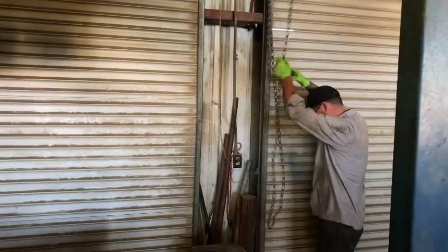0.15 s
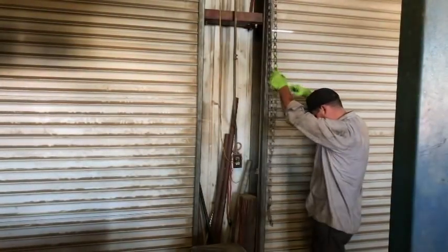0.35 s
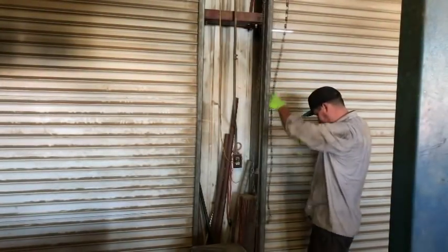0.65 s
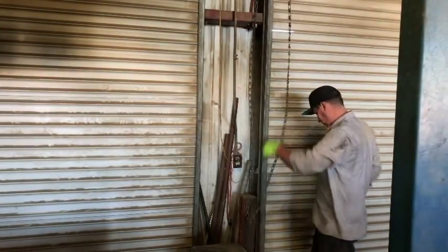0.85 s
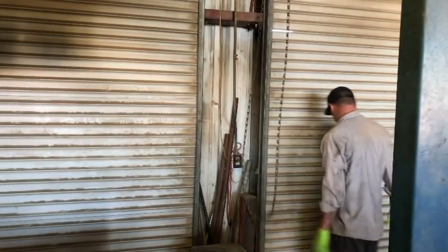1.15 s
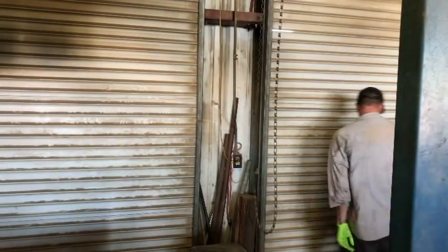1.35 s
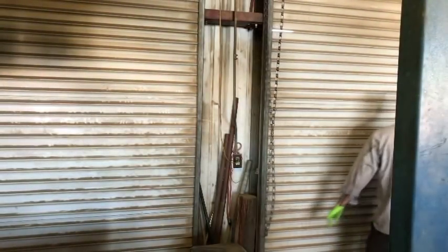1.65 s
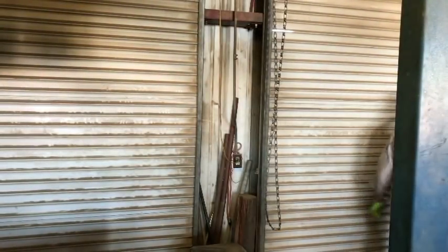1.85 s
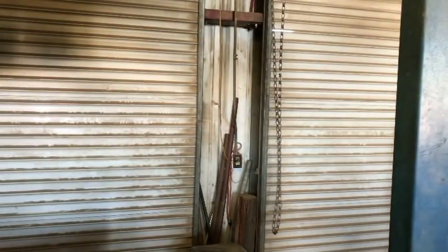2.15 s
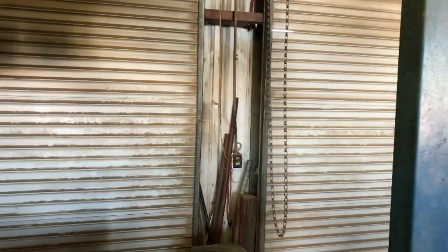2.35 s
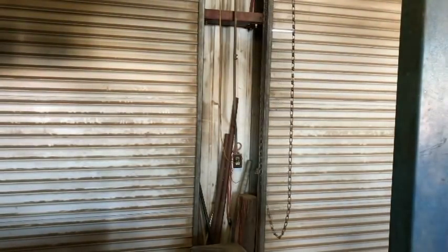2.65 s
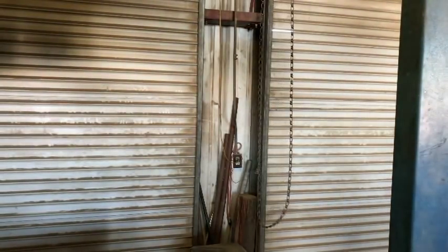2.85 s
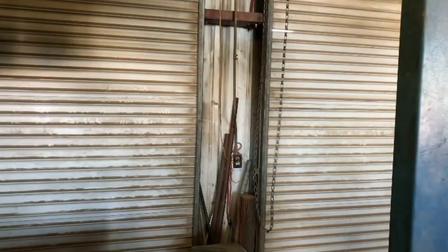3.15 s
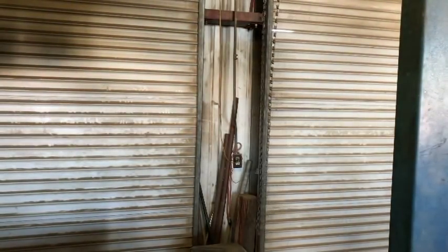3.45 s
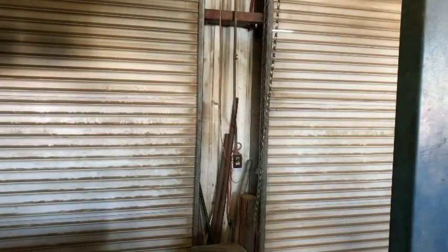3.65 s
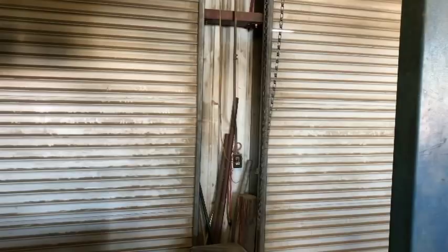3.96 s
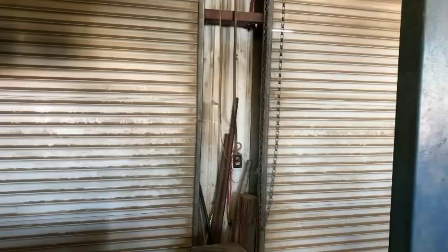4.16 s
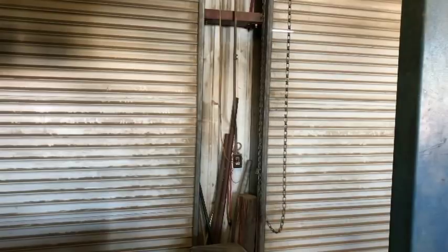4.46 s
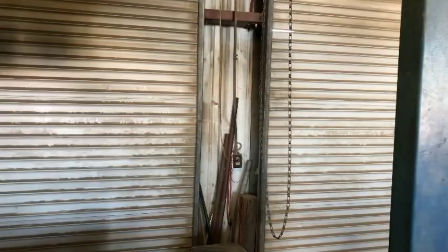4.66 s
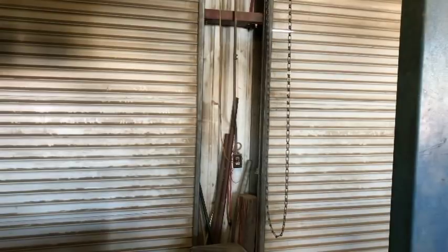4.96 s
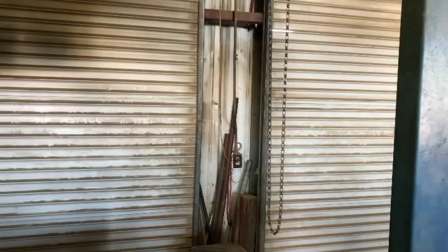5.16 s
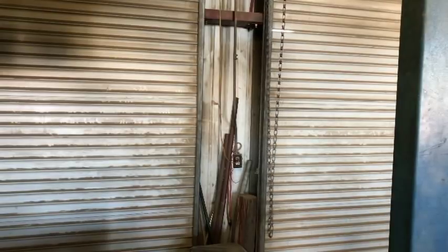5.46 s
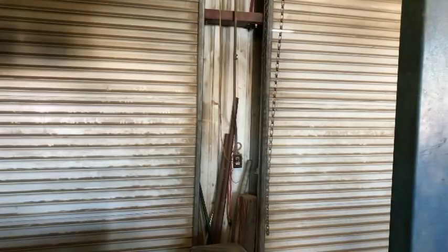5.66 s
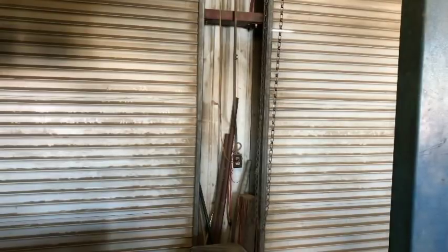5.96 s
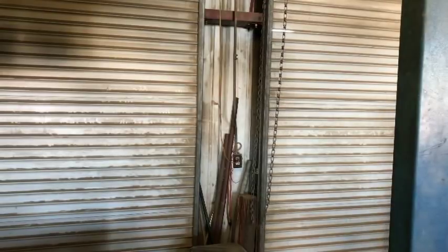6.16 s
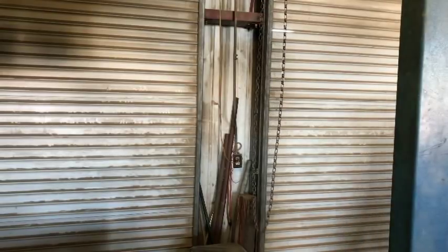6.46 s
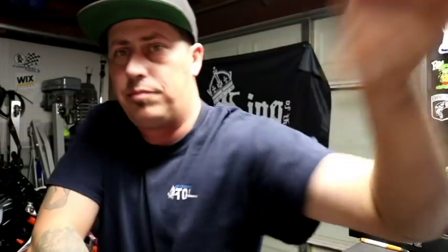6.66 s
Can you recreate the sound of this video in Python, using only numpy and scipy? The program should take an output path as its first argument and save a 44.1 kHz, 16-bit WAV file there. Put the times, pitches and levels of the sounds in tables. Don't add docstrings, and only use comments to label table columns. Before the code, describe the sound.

At 0 s a loud chain jerk hits with a booming, rattling, hissing corrugated steel door; slats knock dryly, links tap the drum at 0.2, and heavier jerks clatter at 0.4, 0.6 and 0.8. The door's treble dies first, and it is almost still by 1.7. Tiny dry chirps come around 1.1-1.4, a lighter rail slap at 1.77, heel knocks at 1.83 and 1.98, clinks at 2.1-2.2. A hard double chain slap lands at 2.48 with a heavy step. Soft scuffs and brushes follow, with brief rubber squeaks at 3.15 and 3.48 and dull steps near 3.75. The chain bangs a post with bounces at 4.02-4.11. Faint brushes lead to a softer slap at 5.74 and distant steps. A low machine hum wavers from 2.2. Bare walls echo throughout. At 6.65 a momentary silence cuts to a quiet, dry room: low handling wobble and creaking plastic.

```python
import sys
import numpy as np
from scipy import signal
from scipy.fft import rfft, irfft
from scipy.io import wavfile
from scipy.ndimage import uniform_filter1d

SR = 44100
rng = np.random.default_rng(int(sys.argv[2]) if len(sys.argv) > 2 else 0)


def to_linear_factor(level_db):
    exponent = np.asarray(level_db, float) / 20
    return 10 ** exponent


def unload_audio(sound):
    columns = np.transpose(np.atleast_2d(sound))
    steps = np.round(np.clip(columns, -1, 1) * 32767)
    wavfile.write(sys.argv[1], SR, steps.astype(np.int16))


N = 300762

# t/s, level/dB
CURTAIN_SHAKE = [
    (0.0, -15),
    (0.14, -15.5),
    (0.45, -21.5),
    (0.8, -24.5),
    (1.17, -29.5),
    (1.5, -36),
    (1.74, -41),
    (2.45, -50),
]
# t/s, rattle level/dB
SURGES = [
    (0.202, -12.5),
    (0.266, -14),
    (0.59, -23.5),
    (0.77, -27.5),
    (0.855, -19),
    (1.3, -36),
    (1.56, -44.5),
    (1.85, -43.5),
    (1.991, -51),
    (2.26, -54),
]
# f/Hz, density/dB
BOOM_SPECTRUM = [(12, -33), (20, -19.5), (54, 0.5), (173, 1), (276, -3.5), (387, -6), (420, -20),
                 (500, -9.5), (650, -40.5), (1100, -120)]
SLAT_SPECTRUM = [(120, -26), (200, 1), (278, -13), (385, 0.5), (496, -6), (540, 0), (660, 2.5), (986, -0.5),
                 (1210, -11.5), (2500, -12), (3250, -19), (5500, -120)]
HISS_SPECTRUM = [(590, -27), (1000, -3), (1290, -0.5), (1550, -5), (3080, -10), (3840, -7.5), (9170, -23.5),
                 (10300, -23), (12400, -25.5), (16000, -30.5)]
# f/Hz, level/dB, t60/s
SHEET_MODES = [(120, -8.5, .25), (165, 2, 0.13), (232, -4.5, 0.4), (318.6, 1.5, .3), (390, -1, .3),
               (548.6, 4, 0.35), (670, -2.5, .3), (691, -5, 0.33), (770, -8, .3), (1040, -7, 0.55)]
BOOM_DB, SLAT_DB, HISS_DB, SHEET_DB = -1.3, 1, -3, -10.5
SLAT_FOLLOW, HISS_FOLLOW, SHEET_FOLLOW = 1.23, 1.72, 0.99
SURGE_RISE_S, SURGE_FALL_DB_PER_S = 0.05, 122.5
SURGE_HISS_DB, SURGE_SHEET_DB = -5.5, -8

# t/s, peak level/dB, curtain boom/dB, clatter length/s, ring level/dB
OPENING = [
    (0.0, 1.5, -6, 0.011, -5),
    (0.02, -12.5, -18, 0.01, -3.5),
]
KNOCKS = [
    (0.2164, -10, -27, 0.004, 13),
    (0.223, -10, -27, 0.005, 14),
]
PULLS = [
    (0.4078, -12.5, -23, 0.024, -8.5),
    (0.4292, -14, 7, 0.11, -4),
    (0.6039, -17, 5.5, 0.0094, 0),
    (0.7995, -10, -21.5, 0.012, -8),
    (0.8236, -5, -34, 0.021, 4),
    (1.0569, -39, -11, 0.026, 7.5),
]
PAWLS = [
    (0.4292, -24, -20, .02, 10),
    (0.606, -27, -20, .02, 8),
]
FIRST_SLAP = [
    (1.7668, -21.5, -6.5, 0.012, 5.4),
    (1.80, -35, 0, 0.02, 3),
]
CLINKS = [
    (2.1045, -33, -10, .008, 8.0),
]
HOOKS = [
    (2.236, -38, -10, .01, 8),
    (3.711, -45, -10, .006, 10),
]
SLAPS = [
    (2.4845, -2, -18.5, 0.022, -1),
    (2.508, -3, -19, 0.022, -0.5),
]
BANGS = [
    (4.0235, -16, -7.5, 0.027, 5),
    (4.048, -15, -17, 0.011, 8),
    (4.0655, -0.5, -11, 0.016, -3.5),
    (4.09, -10, -8.0, 0.013, -4),
    (4.11, -19.5, 2.5, 0.027, 0),
]
LAST_SLAP = [
    (5.740, -13, -17.5, 0.032, 3.8),
]
# f/Hz, level/dB, t60/s
WHEEL_MODES = [(1790, -2, .04), (4050, -5, .02), (5500, -6, .03), (8450, -8, .04), (11000, -6, .04),
               (15200, -10, .03), (7100, -1, .06), (12800, -5, .05)]
DRUM_MODES = [(3700, -1, .025), (4050, 3, 0.033), (4600, -12, .02), (5430, 0, .02)]
PAWL_MODES = [(11300, -6, .05), (12300, -4, .05), (12900, 0, .09), (13500, -5, .06), (15300, -5, .05)]
RAIL_TOP_MODES = [(1350, -1, .05), (2460, 1, .07), (2540, 3, .09), (4340, -9, .03), (6560, -5, .05),
                  (8780, 4, .17), (9485, -7, .04), (10110, -8, .04), (12250, -10, .03)]
RAIL_MODES = [(3424, -6, .05), (3682, -8, .05), (4400, -11, .04), (5405, -9, .04), (5630, -9, .04),
              (6056, -9, .025), (6300, -6, .03), (6530, -5, .04), (1350, -7, .03), (2090, -9, .05),
              (2450, -3, .05), (2540, 0, .06), (8780, 2, .09), (9200, -8, .03)]
RAIL_FOOT_MODES = [(581, -10, .2), (1360, -8, .1), (1560, 1, .035), (2500, 0, .05), (2600, -4, .03),
                   (2700, -5, .05), (3480, -5, .025), (4050, -6, .02), (5670, -6, .04), (5910, -7, .04),
                   (7200, -8, .04), (8790, 4, .12), (9720, -9, .03)]
LINK_MODES = [(3870, -3.5, 0.095), (4284, -6.5, 0.07), (5170, -14, .2), (5670, 0, 0.131), (6090, -9, 0.13),
              (6840, -4.5, 0.11), (7924, -19.5, .15), (8790, -14, .2), (8500, -8, .08), (9850, -8, .12),
              (10700, -13, .1), (11730, -16, .15), (12430, -5, 0.123), (13180, -18.5, .15),
              (13470, -3.5, .12)]
HOOK_MODES = [(4600, -6, .06), (6350, -2, .09), (7180, 0, .15), (8700, -6, .08), (9300, -7, .15),
              (11730, -8, .08), (13400, -11, .06)]
POST_MODES = [(690, 2, .15), (1570, 0, .04), (1965, 0, .07), (2450, -1, .05), (2720, -4, .07),
              (3060, -1, .05), (3550, -3, .07), (4045, 1, .05), (4740, -1, .07), (5900, -5, .03),
              (6890, 0, .06), (7550, -6, .06), (11390, -3, .05), (12800, -5, .05)]
# f/Hz, density/dB
CLATTER_SPECTRUM = [(410, -33.5), (700, -12), (1370, -10.5), (1730, -7), (2440, -4.5), (2820, -5),
                    (5970, -8.5), (7860, -9.5), (8620, -8), (14800, -15), (16200, -26)]
RASP_SPECTRUM = [(410, -48), (1000, -32), (1370, -8), (2150, -13), (2550, -6), (4600, -11), (6200, -5),
                 (7700, -10), (8620, -3), (16200, -13)]
THUD_SPECTRUM = [(47, -39.5), (100, -12), (150, -8.5), (210, -7.5), (350, -8.5), (684, -8.5), (1160, -21.5),
                 (1500, -17), (1950, -31), (3300, -120)]

# t/s, peak level/dB, f/Hz
RATTLES = [(0.08, -6, 724), (0.172, -5, 756), (0.207, -5.5, 740), (0.254, 1.5, 837), (0.356, -11, 710),
           (0.376, -11, 1010), (0.396, -10, 770), (0.534, -14, 830), (0.591, -16, 797), (0.717, -13, 721),
           (0.752, -12, 867), (0.805, -12.5, 1790),
           (0.2165, -6, 3900), (0.224, -6, 4300), (0.13, -7, 800), (0.3, -7, 850), (1.836, -27, 760),
        (1.867, -28, 600), (1.978, -23, 850)]
RATTLE_T60_S, RATTLE_DB = 0.012, -7
# t/s, level/dB, f/Hz, t60/s
SWAYS = [
    (2.52, -39.5, 172.6, 0.56),
    (3.79, -42, 120, .4),
    (5.79, -42.5, 147, .6),
    (4.07, -32, 668, .5),
    (4.27, -42, 150, .3),
]
SWAY_RISE_S = 0.03
# t/s, peak level/dB, curtain boom/dB, centre f/Hz
TICKS = [(0.105, -20.5, -20, 9000), (0.145, -16, -20.5, 9000), (0.172, -7, -19, 13000),
         (0.195, -9.5, -31, 13000), (0.2551, -7, -4, 14000), (.315, -21.5, -21.5, 12970),
         (0.6678, -15, -13, 6960), (0.722, -25, 3, 12000), (1.084, -47, 3, 9000), (1.329, -32.5, -5, 11000),
         (1.447, -35.5, -10.5, 4840), (1.51, -39.5, -8.5, 5850), (1.819, -43.5, -11, 14000),
         (1.887, -42.5, -9, 14000), (1.9755, -38, 7, 3000), (2.070, -42.5, -10, 4500),
         (2.363, -42.5, -8, 13000), (3.56, -34, -1.5, 4940), (3.585, -42, -8, 8000),
         (3.617, -31.5, -6.5, 5980), (3.7245, -28.5, -9.5, 900), (4.0244, -11.5, -23.5, 1285),
         (5.714, -38, -6, 3020)]
# t/s, peak level/dB, curtain boom/dB, length/s, centre f/Hz
BRUSHES = [(1.238, -35.5, 17.5, 0.016, 2970), (1.566, -33.5, 9.5, 0.013, 5040),
           (1.63, -37, -13, 0.05, 6330), (1.9765, -31.5, 2, 0.0036, 810), (1.995, -42, -5, 0.045, 800),
           (2.194, -35.5, 0, 0.073, 4800), (2.913, -37, 1, 0.025, 6900), (3.119, -30.5, 1.5, 0.04, 5540),
           (3.154, -28, -13, 0.033, 2800), (3.264, -32.5, 3.5, 0.018, 6040), (3.414, -33, -7, 0.056, 4600),
           (3.459, -32.5, -6, 0.036, 3800), (3.734, -32, 1, 0.046, 4400), (3.796, -41.5, 8, 0.065, 3110),
           (3.929, -38.5, -1, 0.15, 4400), (4.506, -42, 6, 0.027, 5000), (4.629, -49.5, 3, 0.026, 3970),
           (5.079, -35.5, -11, 0.03, 6830), (5.193, -49, -16.5, 0.047, 7500),
           (5.276, -41.5, 1.5, 0.021, 8770), (5.453, -53.5, 10, 0.035, 4040), (5.558, -47.5, 5, 0.03, 5370),
           (5.682, -43.5, 2.5, 0.043, 4000), (6.11, -35.5, -7.5, 0.04, 8700),
           (6.211, -45.5, 0.5, .057, 4020), (6.401, -46, 3.5, 0.063, 5070), (2.62, -44.5, -17, 0.2, 11900),
           (4.22, -49, -20, .25, 12000)]
TICK_S, TICK_FALL_S, BRUSH_FALL_S = 0.003, 0.008, 0.028
RISE_SHARE = 0.12

# t/s, peak level/dB, length/s, tilt/(dB/octave)
STEPS = [
    (1.831, -25, 0.0075, 3.5),
    (1.976, -26.5, 0.0062, 3.5),
    (2.531, -23.5, 0.043, 3.5),
    (3.19, -31.5, 0.025, 10.5),
    (3.725, -27, 0.015, 0.5),
    (3.787, -27.5, 0.022, -2),
    (5.802, -33.5, 0.022, -1.5),
    (6.147, -34.5, 0.012, -4.5),
]
# f/Hz, density/dB
HEEL_SPECTRUM = [(41, -42.5), (70, -1.5), (123, -6.5), (167, -10.5), (590, -18.5), (781, -17.5),
                 (2000, -38), (2600, -53), (4400, -120)]
# t/s, length/s, f/Hz, level/dB, octave share
SQUEAKS = [
    (3.151, 0.14, 1550, -42.5, .1),
    (3.478, 0.18, 1400, -47.5, .3),
    (3.49, .1, 1530, -49.5, 0.72),
]
SQUEAK_RISE_S, SQUEAK_FADE_DB_PER_S, SQUEAK_SAG_HZ_PER_S = 0.01, 107, 294
# t/s, peak level/dB, length/s
CHIRPS = [
    (1.056, -51, 0.013),
    (1.087, -42, .05),
    (1.25, -31, .02),
    (1.323, -22, 0.008),
    (1.373, -33, 0.013),
    (1.4194, -61, .034),
    (1.744, -45, .006),
    (2.004, -44, 0.008),
]
CHIRP_HZ = 13600

# t/s, signed push
JOLTS = [
    (6.651, 0.67),
    (6.669, 0.4),
    (6.689, -0.5),
    (6.704, .5),
    (6.727, 0.36),
    (6.757, -0.3),
    (6.796, 0.2),
]
# t/s, slip level/dB, length/s
CREAKS = [
    (6.655, -37, 0.0039),
    (6.662, -31, 0.00554),
    (6.6935, -35, 0.004),
    (6.701, -33, 0.008),
    (6.71, -49, 0.0042),
    (6.736, -36, 0.004),
    (6.743, -31.5, 0.0053),
    (6.779, -34, 0.005),
]
# f/Hz, level/dB, t60/s
MOUNT_MODES = [(23, 10.5, 0.079), (60, 7.5, 0.19), (79.1, -2.5, 0.4)]
PLASTIC_MODES = [(1780, -4, 0.018), (1980, 2, 0.016), (2400, -2, 0.0055), (2800, -2, .005),
                 (3200, -2, 0.0081), (3530, 1, 0.008), (3800, -6, 0.0076)]
SHELL_MODES = [(230, 4, 0.07), (333.7, 3, 0.051), (536, 1, 0.06), (620, 3, 0.074), (760, 5, 0.054)]

# f/Hz, t60/s
GARAGE_T60 = [(120, 1.2), (330, 1.27), (870, 0.86), (2300, 0.94), (6060, 0.57), (12000, 0.22),
              (16000, 0.33)]
# t/s, speed f/Hz, level/dB
HUM = [(2.2, 73.3, -54.5), (2.45, 70.3, -47), (2.72, 70.4, -47), (3.04, 76.1, -57.5), (3.241, 74.8, -50),
       (3.7, 72.4, -49), (4.1, 74.8, -50), (4.46, 74.5, -50), (4.81, 74, -58), (4.96, 72, -49.5),
       (5.6, 71.5, -44), (6.18, 72.6, -47.5), (6.5, 72, -59.5)]
# f/Hz, density/dB
AIR_SPECTRUM = [(59, -22), (100, -3.5), (239, -8.5), (261, -10), (303, -9), (473, -15), (724, -12.5),
                (858, -14), (996, -14), (1770, -28), (16200, -43)]
STUDIO_SPECTRUM = [(100, -37), (230, -14), (585, -21), (1000, -32), (1500, -36), (1800, -33.5), (4150, -33),
                   (13000, -36.5), (16200, -38.5)]
RUMBLE_DB, AIR_DB, STUDIO_DB = -54, -53, -41
CUT_S, BACK_S = 6.645, 6.654


def curtain():
    t = np.arange(N) / SR
    shake_db = np.interp(t, *np.transpose(CURTAIN_SHAKE), right=-120)
    start_db = CURTAIN_SHAKE[0][1]
    lost_db = shake_db - start_db
    surge_power = np.zeros(N)
    for s, db in SURGES:
        rise = np.clip(1 + (t - s) / SURGE_RISE_S, 0, 1)
        fall_db = SURGE_FALL_DB_PER_S * np.maximum(t - s, 0)
        surge_power += rise ** 2 * to_linear_factor(2 * (db - fall_db))

    def level(db, follow, surge_db):
        steady_power = to_linear_factor(2 * (start_db + db + follow * lost_db))
        return np.sqrt(steady_power + to_linear_factor(2 * surge_db) * surge_power)

    knocks = (rng.random(N) < 45 / SR) * to_linear_factor(3.5 * np.minimum(rng.exponential(1, N), 3))
    flares = signal.lfilter([1], [1, -np.exp(-1 / (0.0032 * SR))], knocks)
    jolted = 1 + 0.14 * flares
    boom = to_linear_factor(shake_db + BOOM_DB) * patchy(BOOM_SPECTRUM, patchy_db=1.5, size=2048)
    slats = evened(jolted * patchy(SLAT_SPECTRUM, patchy_db=-2.0, size=1024))
    panel = evened(signal.fftconvolve(jolted * rng.standard_normal(N), ring(SHEET_MODES, size=16384))[:N])
    hiss = evened(jolted * patchy(HISS_SPECTRUM, patchy_db=2.0, size=512))
    return (boom + level(SHEET_DB, SHEET_FOLLOW, SURGE_SHEET_DB) * panel
            + level(SLAT_DB, SLAT_FOLLOW, 0) * slats + level(HISS_DB, HISS_FOLLOW, SURGE_HISS_DB) * hiss)


def metal():
    rasp, clatter = RASP_SPECTRUM, CLATTER_SPECTRUM
    return (chain(SLAPS, RAIL_MODES, rasp, rise=0.005, split=25, tilt_db=1.2, contact=0.52, grain_db=3.0, fall=0.017)
            + chain(FIRST_SLAP, RAIL_TOP_MODES, rasp, rise=0.0018, split=31, tilt_db=-2.5, contact=0.7,
                    grain_db=0.5, fall=0.0178)
            + chain(LAST_SLAP, RAIL_FOOT_MODES, rasp, rise=0.003, split=19, tilt_db=-1.2, contact=0.45,
                    grain_db=4.5, fall=0.019)
            + chain(BANGS, POST_MODES, clatter, rise=0.0017, split=67, tilt_db=-0.5, contact=0.32,
                    grain_db=4.0, fall=0.0078)
            + chain(CLINKS, LINK_MODES, clatter, rise=0.00037, split=7.5, tilt_db=2.5, contact=0.36,
                    grain_db=6.0, fall=0.03)
            + chain(HOOKS, HOOK_MODES, clatter, rise=0.0011, split=9, tilt_db=2.0, contact=0.46,
                    grain_db=2.5, fall=0.016)
            + chain(PULLS, WHEEL_MODES, clatter, rise=0.0018, split=24, tilt_db=-0.1, contact=0.45,
                    grain_db=2.5, fall=0.039)
            + chain(OPENING, WHEEL_MODES, clatter, rise=0.00043, split=40, tilt_db=-0.5, contact=0.1,
                    grain_db=3.0, fall=0.049)
            + chain(KNOCKS, DRUM_MODES, clatter, rise=0.00047, split=60, tilt_db=4.0, contact=0.26,
                    grain_db=5.0, fall=0.0067)
            + chain(PAWLS, PAWL_MODES, clatter, rise=0.002, split=30, tilt_db=4.0, contact=0.3,
                    grain_db=3, fall=0.03))


def chain(blows, modes, colour, rise, split, tilt_db, contact, grain_db, fall):
    out = np.zeros(N)
    answer = ring(modes, size=8192, split=split)
    for s, peak_db, boom_db, length, ring_db in blows:
        swarm = burst(length, rise, grain_db, fall)
        add(out, s, to_linear_factor(peak_db - 17.0) * shaped(swarm, colour, tilt_db))
        strike = 0.7 * swarm
        strike[round(rise * SR)] += contact * np.linalg.norm(swarm)
        add(out, s, to_linear_factor(peak_db - 23.0 + ring_db) * signal.fftconvolve(strike, answer))
        add(out, s, to_linear_factor(peak_db - 20.0 + boom_db) * thud(length, rise))
    return out


def thud(length, rise):
    slow = burst(length + 0.024, rise=rise + 0.011, grain_db=-4.0)
    return shaped(slow, THUD_SPECTRUM, fade=250)


def rattles():
    out = np.zeros(N)
    t = np.arange(1024) / SR
    for s, db, hz in RATTLES:
        pair = np.sin(2 * np.pi * hz * t) + 0.6 * np.sin(2 * np.pi * 1.7 * hz * t)
        decay = to_linear_factor(db + RATTLE_DB - 60 * t / RATTLE_T60_S)
        add(out, s, decay * np.minimum(t / 0.001, 1) * pair)
    t = np.arange(16384) / SR
    fade = np.cos(t / t[-1] * np.pi / 2)
    for s, db, hz, t60 in SWAYS:
        shape = to_linear_factor(db - 60 * t / t60) * np.minimum(t / SWAY_RISE_S, 1) * fade
        add(out, s, shape * np.sin(2 * np.pi * hz * t))
    return out


def brushes(touches, fall):
    out = np.zeros(N)
    for s, peak_db, boom_db, length, hz in touches:
        rise = RISE_SHARE * length
        hump = [(0.12 * hz, -20), (0.35 * hz, -5), (hz, 0), (1.7 * hz, -8), (4.0 * hz, -26), (8.0 * hz, -55)]
        swarm = burst(length, max(rise, 0.0005), fall=fall)
        add(out, s, to_linear_factor(peak_db - 18.0) * shaped(swarm, hump))
        add(out, s, to_linear_factor(peak_db - 19.0 + boom_db) * thud(length, rise))
    return out


def steps():
    out = np.zeros(N)
    for s, db, length, tilt_db in STEPS:
        swarm = burst(length, rise=0.0013, fall=0.012)
        add(out, s, to_linear_factor(db - 12.0) * shaped(swarm, HEEL_SPECTRUM, tilt_db))
    return out


def squeaks():
    out = np.zeros(N)
    for s, length, hz, db, octave in SQUEAKS:
        t = np.arange(min(round(length * SR), 8192)) / SR
        wander, grip = uniform_filter1d(rng.standard_normal((2, 8192)), size=100)[:, :len(t)] * 10
        pitch_hz = (hz - SQUEAK_SAG_HZ_PER_S * t) * (1 + 0.013 * wander)
        phase = 2 * np.pi * np.cumsum(pitch_hz) / SR
        whistles = np.sin(phase) + 1.35 * np.sin(1.1 * phase) + octave * np.sin(2 * phase)
        tone = np.sqrt(2) * whistles * to_linear_factor(3.9 * grip)
        shape = np.minimum(t / SQUEAK_RISE_S, 1) * to_linear_factor(db - SQUEAK_FADE_DB_PER_S * t)
        add(out, s, shape * tone * signal.windows.tukey(len(t), 0.1))
    for s, db, length in CHIRPS:
        once = resonate(burst(length), CHIRP_HZ, 700)
        add(out, s, to_linear_factor(db - 5.0) * resonate(once, CHIRP_HZ, 700))
    return out


def mount():
    push, slips = np.zeros(N), np.zeros(N)
    for s, force in JOLTS:
        add(push, s, force * np.hanning(340))
    for s, db, length in CREAKS:
        add(slips, s, to_linear_factor(db + 0.5) * burst(length, rise=0.0016, size=1024)[:round(length * SR)])
    wobble = to_linear_factor(-15.0) * signal.fftconvolve(push, ring(MOUNT_MODES, size=8192))[:N]
    joint = signal.butter(4, [1650, 4000], "band", fs=SR, output="sos")
    creak = signal.sosfilt(joint, signal.fftconvolve(slips, ring(PLASTIC_MODES, size=4096))[:N])
    dull_slips = uniform_filter1d(slips, size=36)
    body = to_linear_factor(4.5) * signal.fftconvolve(dull_slips, ring(SHELL_MODES, size=8192))[:N]
    hush = to_linear_factor(STUDIO_DB) * patchy(STUDIO_SPECTRUM, patchy_db=1.5, size=512)
    return wobble + creak + body + hush


def garage(x):
    taps = np.zeros((2, SR))
    at = np.arange(100, SR - 20, 20)
    places = at + rng.integers(0, 20, (2, len(at)))
    signs = rng.choice([-1., 1.], (2, len(at)))
    np.put_along_axis(taps, places, signs, 1)
    hz, t, z = signal.stft(taps, SR, nperseg=256)
    t60_s = np.clip(read(GARAGE_T60, hz), 0.05, 3)[:, None]
    tail = signal.istft(z * to_linear_factor(-60 * t / t60_s), SR, nperseg=256)[1]
    turn = 2 * np.pi * 9 * np.arange(N) / SR
    fed = x * np.array([np.cos(turn), np.sin(turn)])
    return signal.fftconvolve(fed, tail / np.linalg.norm(tail[0]), axes=1)[:, :N].sum(0)


def machine():
    s, speed_hz, hum_db = np.transpose(HUM)
    t = np.arange(N) / SR
    hum = np.sqrt(2) * np.sin(2 * np.pi * np.cumsum(np.interp(t, s, speed_hz)) / SR)
    rumble = evened(resonate(resonate(rng.standard_normal(N), 50, 22), 50, 22))
    air = to_linear_factor(AIR_DB) * patchy(AIR_SPECTRUM, patchy_db=1.6, size=2048)
    return to_linear_factor(np.interp(t, s, hum_db)) * hum + to_linear_factor(RUMBLE_DB) * rumble + air


def burst(length, rise=0.0026, grain_db=3.0, fall=0.022, size=8192):
    t = np.arange(size) / SR
    shape = np.clip(t / rise, 0, 1) * np.exp(-np.maximum(t - max(length, 0.002), 0) / fall)
    sign, force = rng.standard_normal(size), rng.exponential(1, size)
    return evened(sign * to_linear_factor(grain_db * np.minimum(force, 4))) * shape


def ring(modes, size, split=0.0):
    t = np.arange(size) / SR
    beat = 1 + 0.28 * np.cos(2 * np.pi * split * t)
    y = sum(to_linear_factor(db - 60 * t / t60) * np.sin(2 * np.pi * hz * t) * beat for hz, db, t60 in modes)
    return y / np.linalg.norm(y)


def shaped(swarm, colour, tilt_db=0, fade=40):
    y = coloured(swarm, colour, tilt_db)
    y = y * np.linalg.norm(swarm) / np.linalg.norm(y)
    return y * np.minimum(np.arange(len(y)) / fade, 1)


def coloured(x, spectrum, tilt_db=0):
    hz = np.fft.rfftfreq(len(x), 1 / SR)
    gain_db = read(spectrum, hz) + tilt_db * np.log2(np.maximum(hz, 100) / 4000)
    return irfft(rfft(x) * to_linear_factor(gain_db), len(x))


def patchy(spectrum, patchy_db, size):
    hz = np.fft.rfftfreq(size, 1 / SR)
    a, b, patches = rng.standard_normal((4 * N // size + 5, len(hz), 3)).T
    patches = uniform_filter1d(uniform_filter1d(patches, size=6, axis=0), size=8, axis=1)
    z = (a + 1j * b) * to_linear_factor(read(spectrum, hz)[:, None] + patchy_db * evened(patches))
    return evened(signal.istft(z, nperseg=size, noverlap=3 * size // 4)[1][:N])


def resonate(x, hz, width):
    turn = np.exp(2j * np.pi * np.cumsum(hz * np.ones(len(x))) / SR)
    r = np.exp(-np.pi * width / SR)
    return 2 * (turn * signal.lfilter([1 - r], [1, -r], x / turn)).real


def read(points, hz):
    f, value = np.transpose(points)
    return np.interp(np.log(hz + 1), np.log(f + 1), value, left=value[0], right=value[-1])


def evened(x):
    return x / np.sqrt(np.mean(x ** 2) + 1e-20)


def add(mix, s, sound):
    part = mix[round(s * SR):][:len(sound)]
    part += sound[:len(part)]


def scene():
    ticks = brushes([(s, db, boom_db, TICK_S, hz) for s, db, boom_db, hz in TICKS], TICK_FALL_S)
    near = metal() + ticks + brushes(BRUSHES, BRUSH_FALL_S) + steps() + rattles()
    no_bass = signal.butter(2, 75, "high", fs=SR, output="sos")
    near = signal.sosfilt(no_bass, near)
    shoes = squeaks()
    first = to_linear_factor(2.0) * near + shoes + to_linear_factor(-3.0) * garage(near + 0.5 * shoes) + curtain() + machine()
    t = np.arange(N) / SR
    fade_out = np.clip((CUT_S - t) / 0.0019, 0, 1)
    fade_in = np.clip((t - BACK_S) / 0.00155, 0, 1)
    mono = first * fade_out + mount() * fade_in
    return np.array([mono, mono])


def roll_off(x):
    return signal.sosfilt(signal.butter(12, 16840, fs=SR, output="sos"), x)


def record(dry):
    dipped = dry - 0.53 * resonate(dry[0], 10400, 900)
    overloaded = 1.494 * np.tanh(dipped / 1.506)
    x = signal.oaconvolve(overloaded, signal.firwin(511, 16100, fs=SR)[None], "same")
    edge = to_linear_factor(-41.5) * np.diff(x[0], 2, prepend=[0, 0])
    return roll_off(x + [edge, -edge])


dry = scene()
out = record(dry)
unload_audio(out)
```